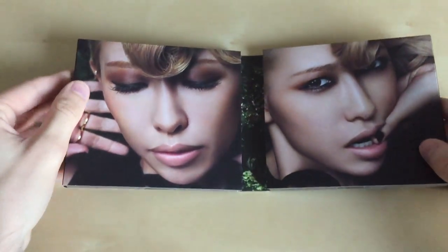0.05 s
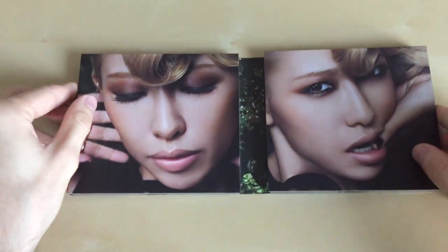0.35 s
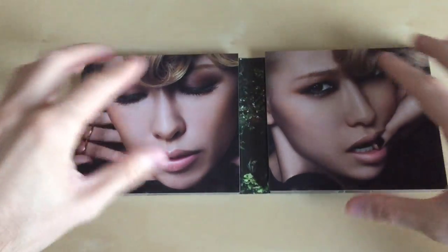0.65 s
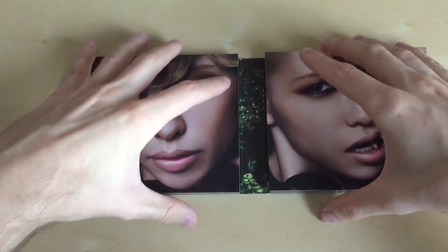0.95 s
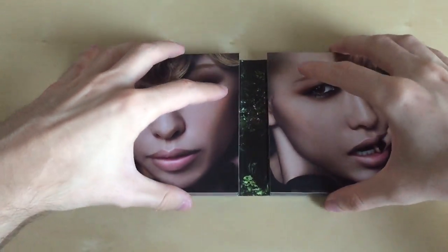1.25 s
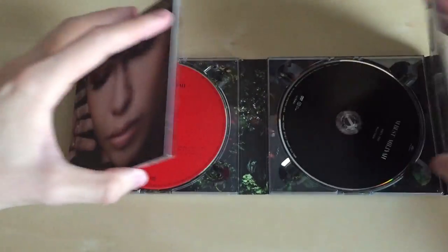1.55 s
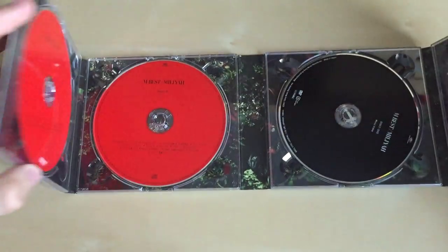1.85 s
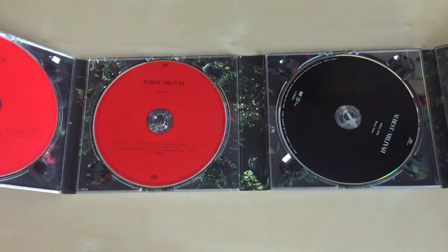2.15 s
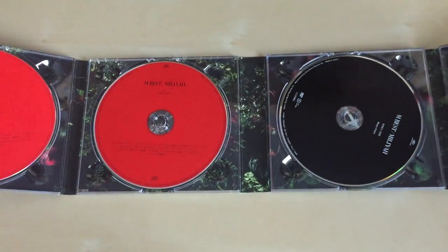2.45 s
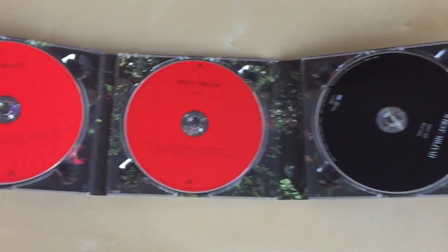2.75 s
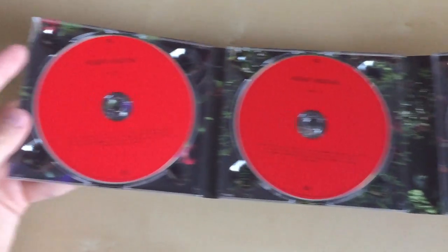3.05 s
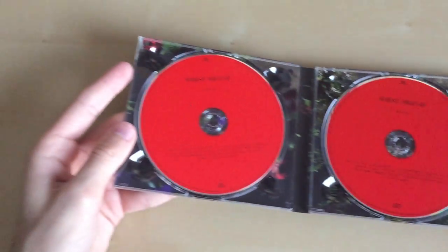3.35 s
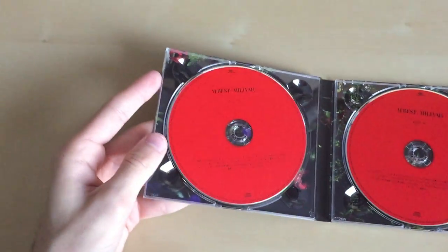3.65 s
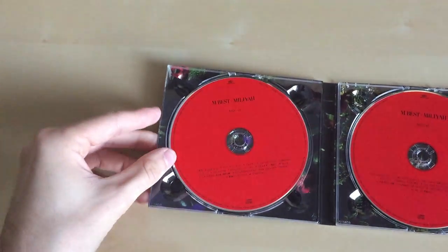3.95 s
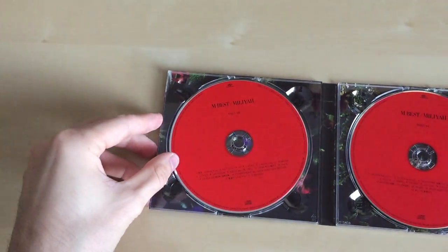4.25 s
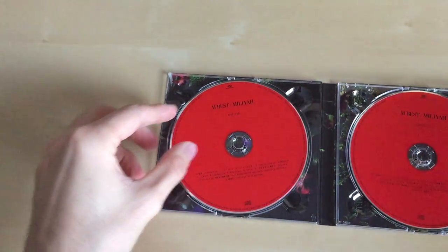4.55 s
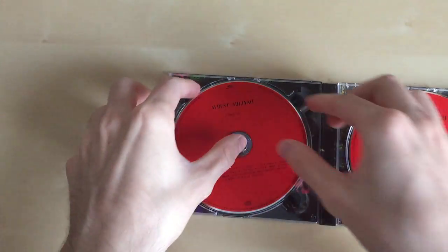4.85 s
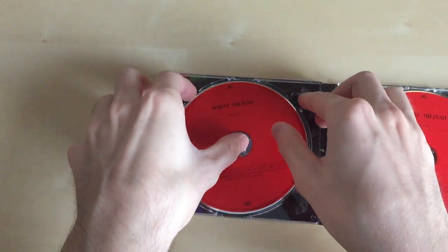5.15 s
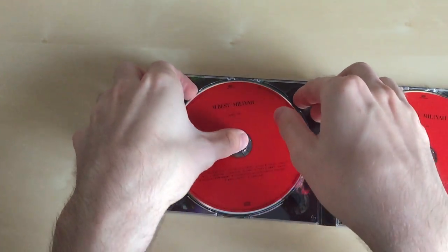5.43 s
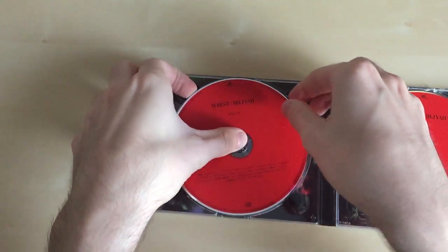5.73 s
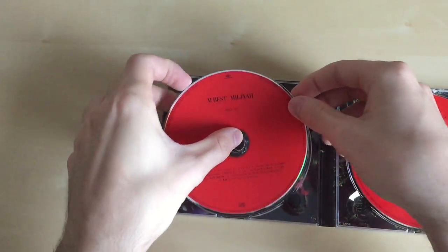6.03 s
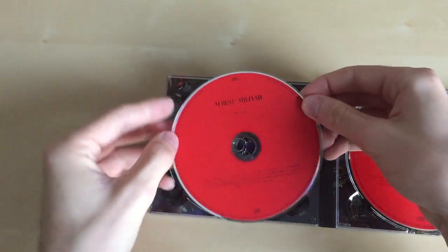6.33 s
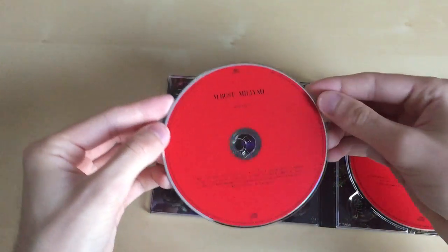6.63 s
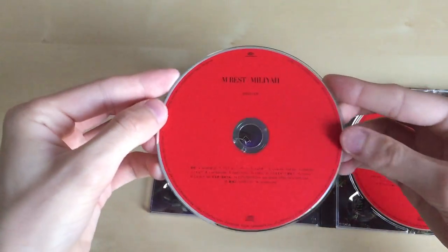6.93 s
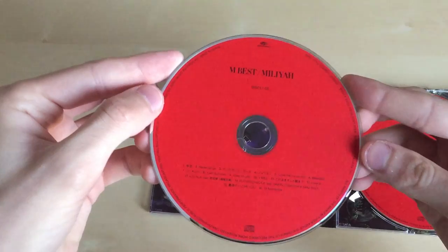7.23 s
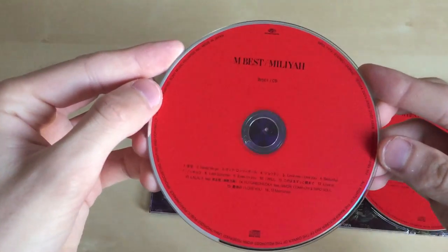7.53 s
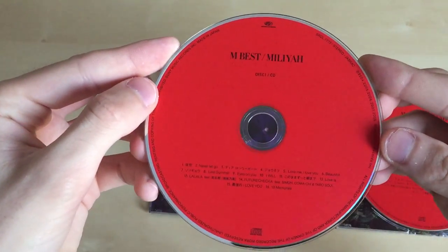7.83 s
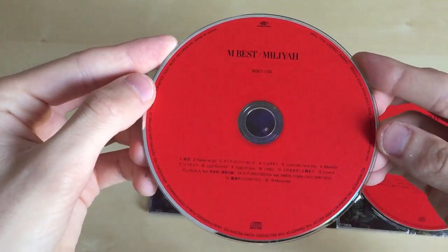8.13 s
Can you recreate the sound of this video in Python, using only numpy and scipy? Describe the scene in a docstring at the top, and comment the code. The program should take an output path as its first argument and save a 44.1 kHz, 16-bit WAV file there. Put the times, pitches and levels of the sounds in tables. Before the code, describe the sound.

Soft rubbing and plastic clicks from a disc case on a table, then a sharp snap and a few ticks as the disc lifts out.

```python
"""At a wooden table in a small room, hands unfold a cardboard disc case.
Its flaps rub by sliding friction, its plastic trays tap down, and the table top booms under the pushes.
A thumb presses the hub until the disc pops off with one sharp snap and the bent tray springs back;
the disc then ticks and rings against the tray as it is lifted.
The room reverberates, over a faint mains hum, rumble and hiss."""
import sys
import numpy as np
from scipy import signal
from scipy.fft import rfft, irfft
from scipy.io import wavfile
from scipy.ndimage import map_coordinates

SR = 44100
rng = np.random.default_rng(int(sys.argv[2]) if len(sys.argv) > 2 else 0)


def store_pcm(level_fs):
    """Save levels as 16-bit WAV."""
    pcm = np.round(np.clip(level_fs, -1, 1) * 32767).astype(np.int16)
    wavfile.write(sys.argv[1], SR, np.atleast_2d(pcm).T)


N = 369558
TIME = np.arange(N) / SR
AGE = TIME[:SR // 2]  # time since a contact
BODY_HZ, MID_HZ, TREBLE_HZ = 820, 1690, 4410  # lower edges of the case's three registers

# spectrum of the hub's crack: f/Hz, spectral level/dB
CRACK_SPECTRUM = [(600, -9), (2500, 8), (3400, 6.5), (4000, -0.5), (5700, 3), (7500, -7), (9700, 1),
                  (10500, -8), (11800, -0.5), (13500, -8), (16000, -10)]
# modes of the tray: f/Hz, level/dB, T60/s
TRAY_MODES = [(324, -31.5, .05), (526, -28.5, 0.024), (694, -20.5, 0.028), (906, -5.5, 0.01),
              (1100, -4, .014), (1690, -2, 0.011), (2070, -8, 0.01308), (2430, -15, 0.016),
              (3130, -19.5, 0.0089)]


def pop(s=5.6613):
    """Release of elastic energy: the hub's teeth crack free; the tray springs back and knocks the card."""
    out = np.zeros(N)
    crack = coloured(rng.standard_normal(len(AGE)), CRACK_SPECTRUM)
    add(out, s, amp(-17) * crack * fade(t60=0.021))
    spring = sum((-1) ** k * amp(db) * ring(hz, t60) for k, (hz, db, t60) in enumerate(TRAY_MODES))
    add(out, s + 0.0005, amp(-1) * spring * swell(rise_s=0.0012))
    knock = unit(band(rng.standard_normal(len(AGE)), 250, 520, order=2))
    add(out, s, amp(-36) * knock * fade(t60=0.072))
    return out


# touches of the disc on hub and tray: t/s, level/dB, treble level/dB, resonance f/Hz
DISC_TOUCHES = [(5.651, -45.5, -2, 3070), (5.657, -48, -13, 2300), (6.022, -56, -23, 2170),
                (6.1008, -53, 6, 2200), (6.1042, -56.5, 2.5, 4540), (6.1645, -49, -10.5, 3260),
                (6.255, -48.5, -3.5, 2300), (6.265, -48, -9, 2200), (6.276, -37, -3, 2300),
                (6.2795, -44, 1, 1090), (6.3783, -56, -6, 890), (6.3834, -50.5, -11.5, 1100)]
# upper modes of the disc: f/Hz, level/dB, T60/s
DISC_MODES = [(1090, -7, 0.045), (1700, -13, 0.029), (2220, -5.5, 0.036), (2610, -7, 0.037),
              (3160, -11.5, 0.05), (4300, -18, .025), (5360, -13.5, 0.085)]
HELD_MODE, FREE_MODE = (735, -2.5, .035), (864, 4.6, .08)  # its lowest mode, same columns


def disc(free_s=6.33):
    """Plate modes: each touch rings the disc; clear of the hub, its lowest mode is higher and longer."""
    out = np.zeros(N)
    for s, db, treble_db, hz in DISC_TOUCHES:
        soft_db = -0.45 * treble_db  # a softer touch trades treble for body
        tick = radiate(contact(t60=0.03, edge=1.3), soft_db / 2 - 1, treble_db, hollow_db=-22)
        tick = resonate(tick, hz, q=7.7, db=11)
        upper = sum(amp(mode_db + rng.normal(0, 2.8)) * rng.choice([-1, 1]) * ring(mode_hz, t60)
                    for mode_hz, mode_db, t60 in DISC_MODES)
        low_hz, low_db, low_t60 = HELD_MODE if s < free_s else FREE_MODE
        lowest = amp(low_db + soft_db) * ring(low_hz, low_t60)
        add(out, s, amp(db) * (tick + amp(2.5) * upper + lowest))
    return out


# impacts on the case and its trays: t/s, level/dB, treble level/dB, resonance f/Hz
CASE_TAPS = [(0.0633, -64, -9, 1136), (.329, -58.5, -6.5, 2900), (.485, -58, -13, 930),
             (.499, -62, -16, 894), (1.011, -58, -21, 2430), (1.0119, -61.5, -24, 850),
             (1.087, -60, -32, 1010), (1.7608, -40.5, -8, 3640), (2.1185, -56, -8, 2980),
             (3.0573, -68.5, -1, 1610), (3.7135, -44.5, -9, 4240), (3.7202, -46.5, -14, 1310),
             (3.7274, -48, -11, 1260), (3.7835, -57.5, -8, 1500), (4.0832, -58, -16, 2560),
             (4.417, -62.5, -11, 2880), (4.9105, -70.5, 0, 3060), (5.026, -72, 1, 3400),
             (5.188, -69, -9, 2900), (7.8372, -57, -4, 1830)]


def taps():
    """Impact excitation: card and plastic click hollowly; a firm tap settles sooner than a light one."""
    out = np.zeros(N)
    for s, db, treble_db, hz in CASE_TAPS:
        t60 = 0.025 * 2 ** ((-52 - db) / 16)  # 16 dB firmer halves the chatter
        click = radiate(contact(t60, edge=6.6), depth_db(hz) - 4, treble_db, hollow_db=-6.5)
        add(out, s, amp(db) * resonate(click, hz, q=5.6, db=12.5))
    return out


# slides of card and plastic: fastest at t/s, half length/s, level/dB, treble level/dB, resonance f/Hz
CASE_SLIDES = [(.252, 0.019, -73, -4, 1070), (0.456, 0.17, -76, -7, 2530), (0.65, 0.0096, -58, -12, 1620),
               (1.171, 0.025, -70, -5, 1020), (1.452, 0.5, -81, -17, 1640), (1.791, 0.028, -50, -3.5, 3530),
               (1.941, 0.019, -64.5, -12, 2260), (2.031, 0.036, -77.5, -2, 2210),
               (2.683, 0.048, -57.5, -7, 3160), (2.7, 0.024, -58.5, -1.5, 1570),
               (2.792, 0.02, -70.5, -6, 3300), (3.733, 0.014, -58, -9, 1320),
               (3.815, 0.053, -62, -10.5, 1360), (3.861, 0.042, -66.5, -1, 1970),
               (3.953, 0.027, -65, -3.5, 2980), (4, .07, -79.5, 9, 3000), (4.098, 0.017, -65, -21, 2540),
               (4.273, 0.065, -77, -15, 2860), (4.421, 0.01, -63, -4, 2860), (5.369, 0.024, -73, -6, 2370),
               (6.386, .008, -53, -14, 4440)]


def slides():
    """Sliding friction: each rubbed spot drives its own mix of dense, damped panel modes into a rasp."""
    out = np.zeros(N)
    for s, half, db, treble_db, hz in CASE_SLIDES:
        slips = friction(len(AGE), spread_db=4.5)
        vibration = unit(signal.fftconvolve(slips, contact(t60=0.015, edge=7.1))[:len(AGE)])
        rasp = radiate(vibration, depth_db(hz) - 5.5, treble_db, hollow_db=-10.5)
        rasp = resonate(rasp, hz, q=2.5, db=1)
        lead = min(s, AGE[-1] / 2)  # the stroke starts before its fastest moment
        add(out, s - lead, amp(db) * rasp * stroke(AGE - lead, half))
    return out


# skids of the fingertips: fastest at t/s, half length/s, level/dB
FINGER_SKIDS = [(0.034, 0.065, -71.5), (0.141, 0.052, -68), (0.642, 0.021, -64.5), (.659, 0.0068, -52)]
# spectrum of skin on gloss: f/Hz, spectral level/dB
SQUEAK_SPECTRUM = [(200, -8), (650, -21.5), (1050, 3), (1400, 0.5), (1750, -1.5), (2100, -8), (2600, -2),
                   (3600, -5), (4900, -7), (5500, 2.5), (6300, 1.5), (7400, -10), (9000, -7), (15000, -17)]


def skids():
    """Friction noise: fingertips squeak on the glossy cover, with amplitude proportional to speed."""
    speed = sum(amp(db) * stroke(TIME - s, half) for s, half, db in FINGER_SKIDS)
    return speed * coloured(friction(N, spread_db=-0.5), SQUEAK_SPECTRUM)


# pushes of the case on the table: t/s, level/dB, f/Hz
TABLE_THUDS = [(0.506, -51.5, 53), (1.088, -60, 150), (1.266, -52, 283), (1.787, -52, 93),
               (2.377, -56.5, 64.3), (3.717, -43, 397), (3.731, -51.5, 88), (3.965, -53.5, 78),
               (5.11, -59, 65.4), (5.67, -30.5, 90), (5.677, -39.5, 149.5), (6.274, -54, 119)]


def table(decay_cycles=14):
    """Constant-Q damping: soft pushes boom in the table top; the deeper the boom, the longer it lasts."""
    out = np.zeros(N)
    for s, db, hz in TABLE_THUDS:
        add(out, s, amp(db) * ring(hz, decay_cycles / hz) * swell(rise_s=0.0053))
    return out


def contact(t60, edge):
    """Impact force: an impulse of height edge, then a quickly dying chatter."""
    chatter = rng.standard_normal(len(AGE)) * fade(t60)
    chatter[0] = edge
    return chatter


def friction(count, spread_db):
    """Friction force: dense tiny slips of unequal size."""
    slips = rng.standard_normal(count)
    size_db = spread_db * np.repeat(rng.standard_normal(count // 16 + 1), 16)[:count]
    return unit(slips * amp(size_db))


def stroke(t, half):
    """Bell-shaped velocity: a hand gathers speed until t = 0, then slows to rest."""
    return np.exp(-np.abs(t / half) ** 1.93)


def radiate(force, body_db, treble_db, hollow_db):
    """Radiation: the place of contact weights the case's body and hard edges against its mid register."""
    hollow = unit(band(force, 210, 520, order=2))
    body = unit(band(force, BODY_HZ, MID_HZ, order=3))
    middle = unit(band(force, MID_HZ, TREBLE_HZ, order=5))
    treble = band(force, TREBLE_HZ, 18000, order=4)
    treble = unit(band(treble, 1500, 9000, order=1))  # soften the top
    low = body + amp(hollow_db) * hollow
    return np.std(force) * (middle + amp(body_db) * low + amp(treble_db) * treble)


def depth_db(hz, db_per_octave=2.5):
    """Modal coupling: a spot that resonates lower lies nearer mid-panel and moves more of the body."""
    return db_per_octave * np.log2(MID_HZ / hz)


def resonate(x, hz, q, db):
    """Resonance: one panel mode stands out; the overall level stays."""
    peak = signal.lfilter(*signal.iirpeak(hz, q, fs=SR), x)
    return unit(x + amp(db) * peak) * np.std(x)


def ring(hz, t60):
    """Damped harmonic oscillation of one mode."""
    return np.sin(2 * np.pi * hz * AGE) * fade(t60)


def fade(t60):
    """Free exponential decay, by 60 dB in t60 seconds."""
    return np.exp(-np.log(1000) * AGE / t60)


def swell(rise_s):
    """Exponential build-up after a contact."""
    return 1 - np.exp(-AGE / rise_s)


# reverberation time of the room: f/Hz, T60/s
ROOM_DECAY = [(100, 0.49), (500, 0.23), (1200, .39), (3000, 0.38), (7000, 0.28), (15000, 0.19)]
# spectrum of the wall reflections: f/Hz, level/dB
WALL_SPECTRUM = [(100, 0), (600, 5), (1200, -2.5), (2500, -2.5), (4500, -1.5), (8000, 0), (15000, -4)]


def room(x, build_s=0.0021):
    """Reverberation: reflections thicken within milliseconds and die fastest in the high treble."""
    hz, t, noise = signal.stft(rng.standard_normal(len(AGE)), SR, nperseg=256)
    level_db = along(WALL_SPECTRUM, hz)[:, None] - 60 * t / along(ROOM_DECAY, hz)[:, None]
    tail = signal.istft(noise * amp(level_db), SR, nperseg=256)[1][:len(AGE)]
    tail *= 1 - np.exp(-(AGE / build_s) ** 2)
    return signal.fftconvolve(x, tail / np.linalg.norm(tail))[:N]


# harmonics of the mains hum: f/Hz, rms level/dB
HUM_HARMONICS = [(48.8, -68), (97.6, -74)]
# spectrum of the rumble: f/Hz, spectral level/dB
RUMBLE_SPECTRUM = [(20, -44), (30, -33), (38, -20), (50, 8.5), (70, -5.5), (100, -3), (135, -13),
                   (200, -30.5), (400, -64.5)]
# spectrum of the hiss: f/Hz, spectral level/dB
HISS_SPECTRUM = [(76, -33.5), (130, -1.5), (247, -3.5), (458, -8.5), (698, -9), (756, -8.5), (870, -9.5),
                 (1170, -11), (1410, -11), (1650, -13.5), (1940, -12.5), (3820, -16), (15500, -25)]


def background():
    """Noise floor: a hum, slightly modulated in level and phase, over stationary rumble and hiss."""
    hum = np.zeros(N)
    for hz, db in HUM_HARMONICS:
        peak = np.sqrt(2) * amp(db + 0.7 * wobble(9.7))
        hum += peak * np.sin(2 * np.pi * hz * TIME + 0.33 * wobble(4.2))
    rumble = coloured(rng.standard_normal(N), RUMBLE_SPECTRUM)
    hiss = coloured(rng.standard_normal(N), HISS_SPECTRUM)
    return hum + amp(-74.5) * rumble + amp(-73) * hiss


def wobble(rate):
    """A smooth random curve, rate knots a second."""
    return map_coordinates(rng.standard_normal(int(N * rate / SR) + 4), [TIME * rate])


def coloured(x, spectrum):
    """Spectral shaping: x filtered by the given spectrum, at rms 1."""
    hz = np.fft.rfftfreq(len(x), 1 / SR)
    return unit(irfft(rfft(x) * amp(along(spectrum, hz)), len(x)))


def band(x, lo_hz, hi_hz, order):
    """Causal band-pass."""
    return signal.sosfilt(signal.butter(order, [lo_hz, hi_hz], "band", fs=SR, output="sos"), x)


def along(points, hz):
    """Interpolation of (f/Hz, value) points on a log frequency axis."""
    f, values = np.transpose(points)
    return np.interp(np.log(hz + 1), np.log(f), values)


def amp(db):
    """Decibels to gain."""
    return 10 ** (np.asarray(db) / 20)


def unit(x):
    """Scale to rms 1."""
    return x / np.sqrt(np.mean(x ** 2) + 1e-20)


def add(track, s, x):
    """Mix x into the track from second s on."""
    start = round(s * SR)
    track[start:start + len(x)] += x[:N - start]


def scene():
    """Superposition of the direct sound, its reverberation and the background."""
    handling = taps() + slides() + skids() + pop() + disc() + table()
    return (handling + amp(-12) * room(handling) + background())[None]


def record(dry):
    """Band limiting: the response falls steeply above 15.9 kHz."""
    hz = np.fft.rfftfreq(N, 1 / SR)
    return irfft(rfft(dry) / (1 + (hz / 15900) ** 120), N)


dry = scene()
out = record(dry)
store_pcm(out)
```